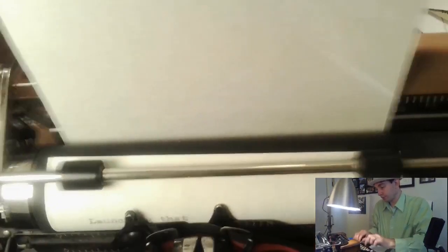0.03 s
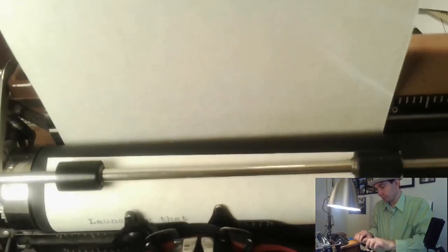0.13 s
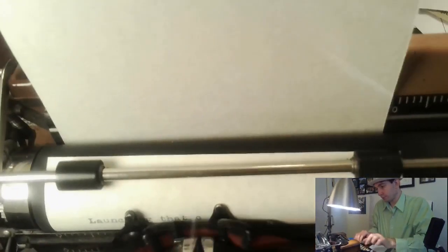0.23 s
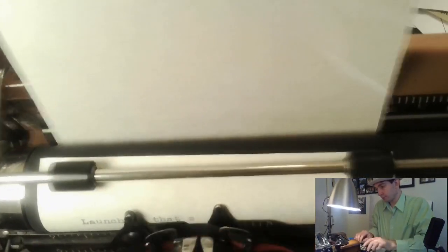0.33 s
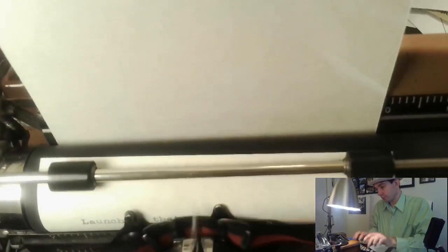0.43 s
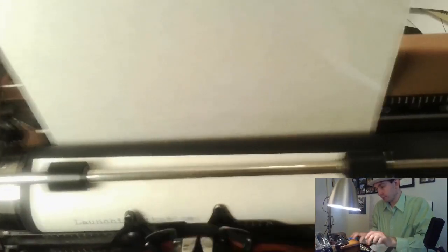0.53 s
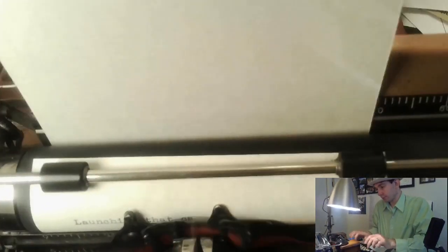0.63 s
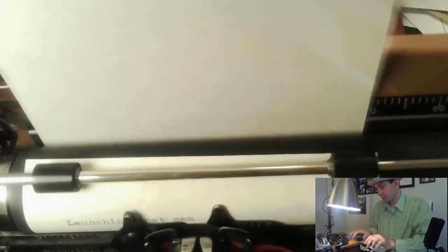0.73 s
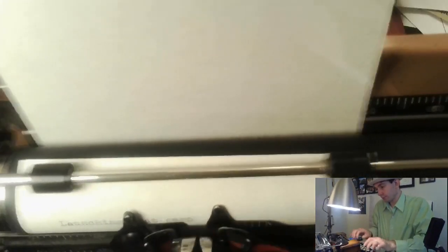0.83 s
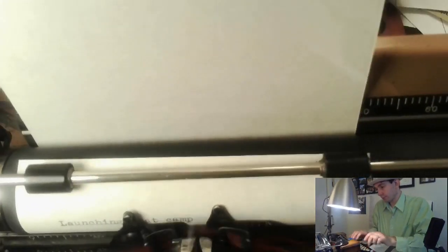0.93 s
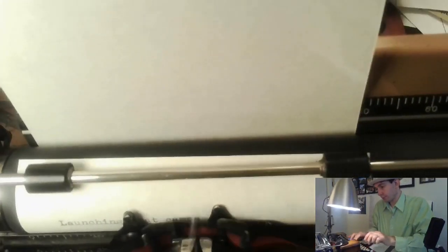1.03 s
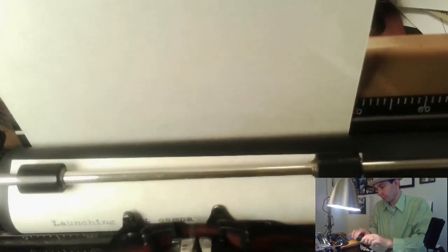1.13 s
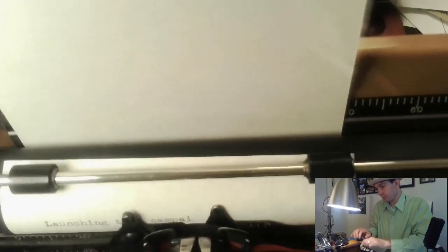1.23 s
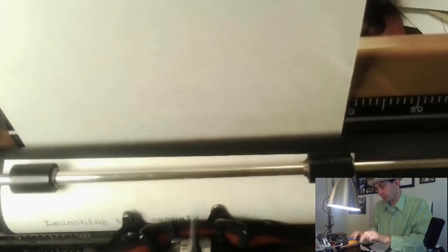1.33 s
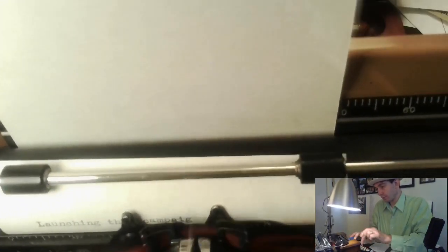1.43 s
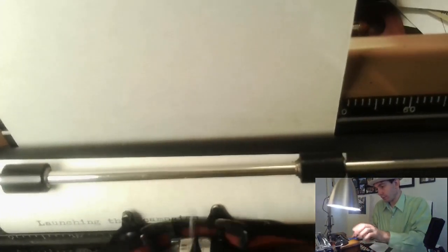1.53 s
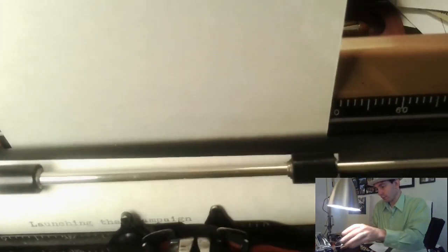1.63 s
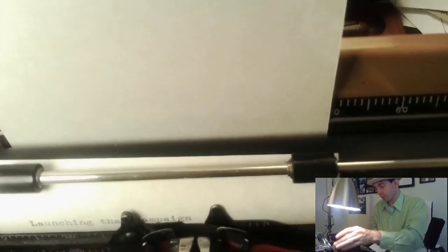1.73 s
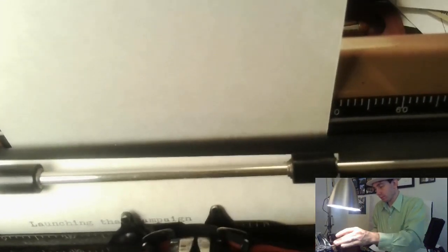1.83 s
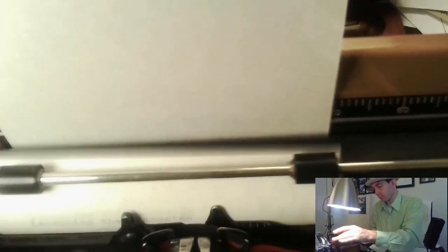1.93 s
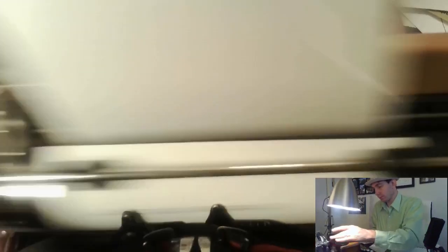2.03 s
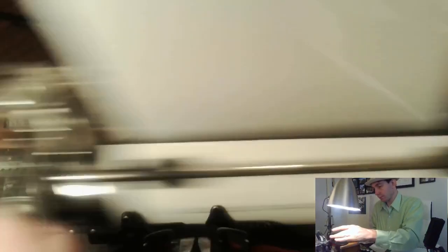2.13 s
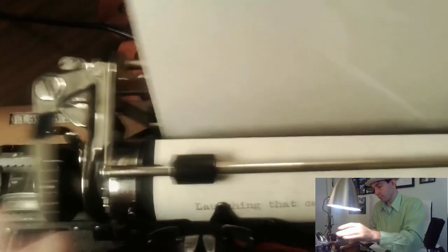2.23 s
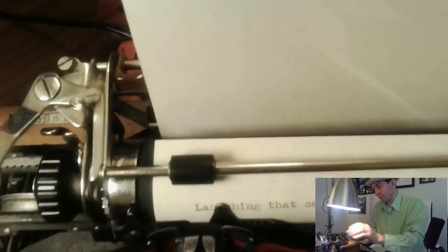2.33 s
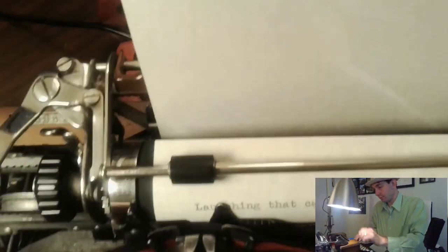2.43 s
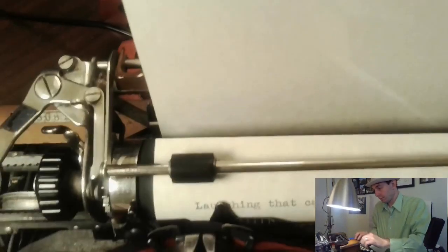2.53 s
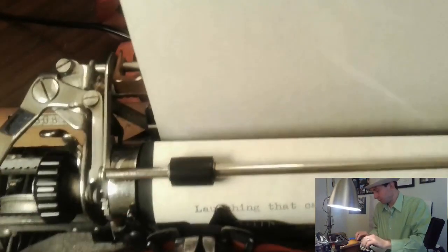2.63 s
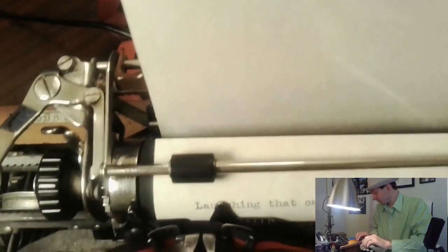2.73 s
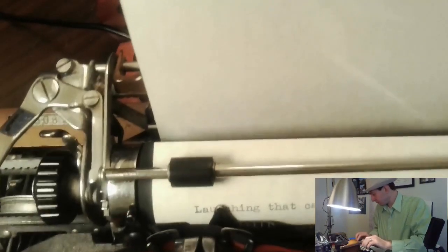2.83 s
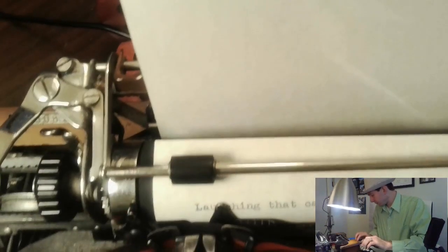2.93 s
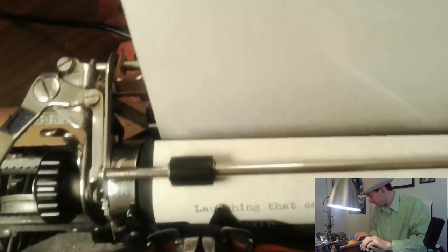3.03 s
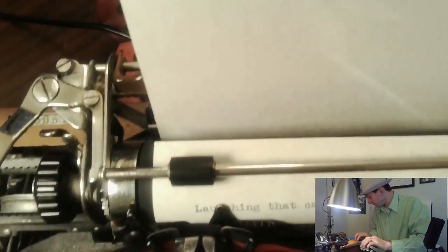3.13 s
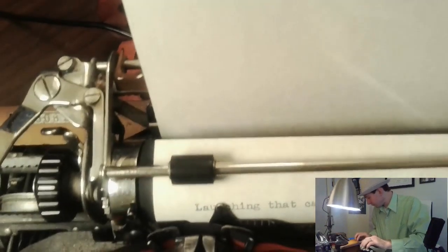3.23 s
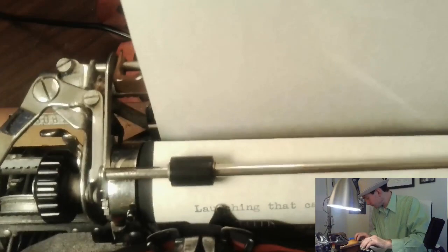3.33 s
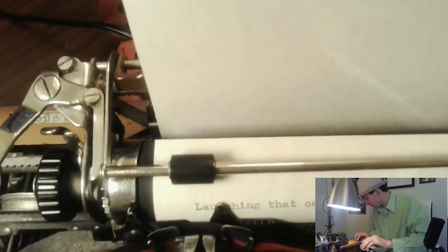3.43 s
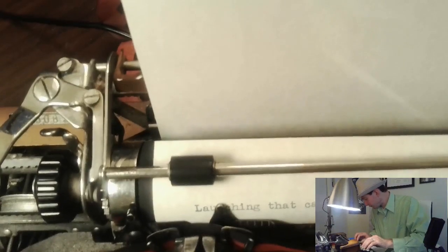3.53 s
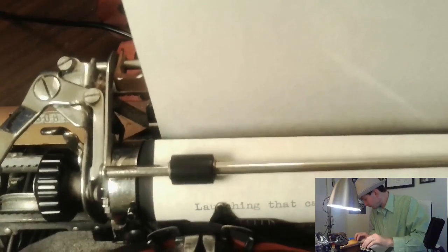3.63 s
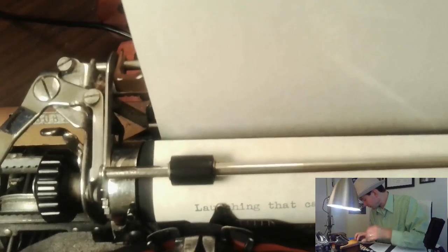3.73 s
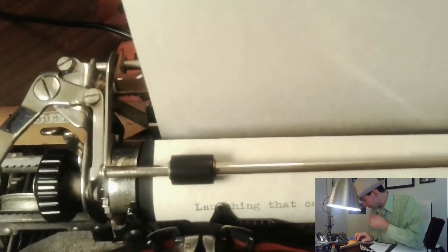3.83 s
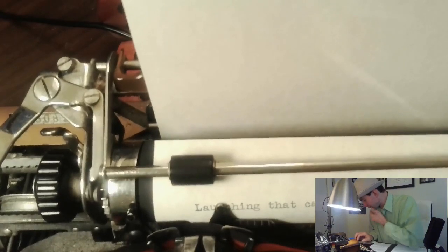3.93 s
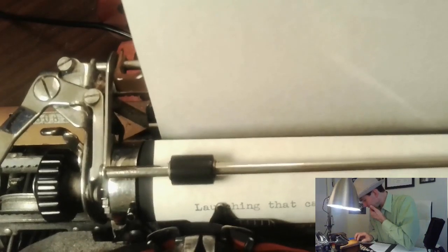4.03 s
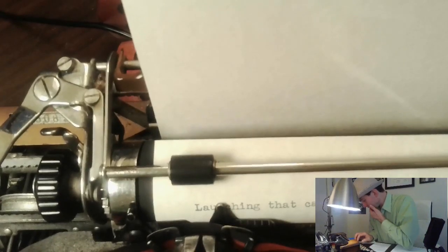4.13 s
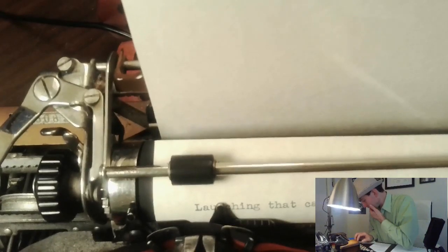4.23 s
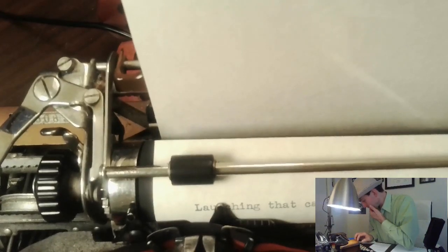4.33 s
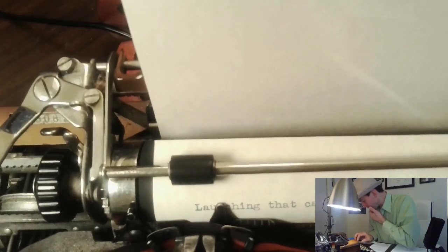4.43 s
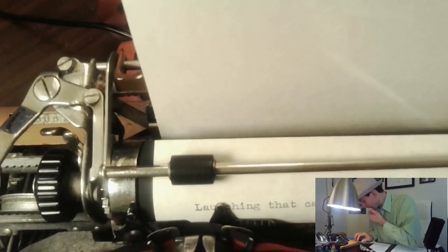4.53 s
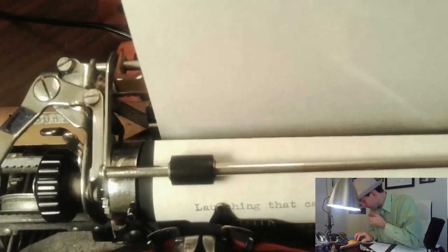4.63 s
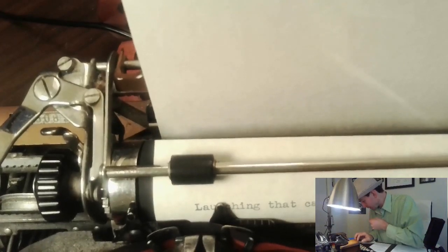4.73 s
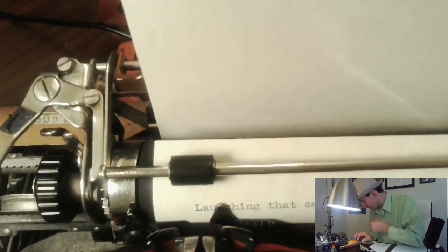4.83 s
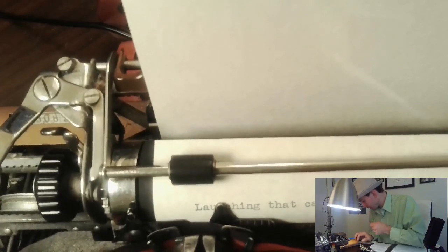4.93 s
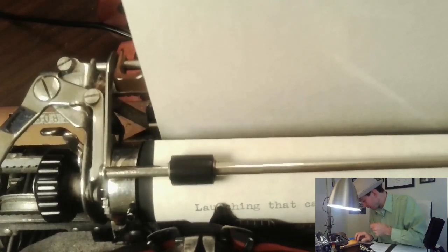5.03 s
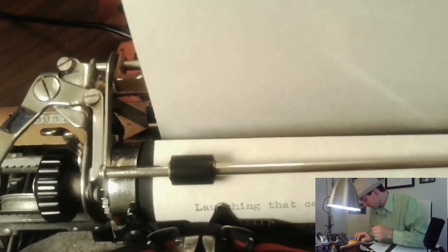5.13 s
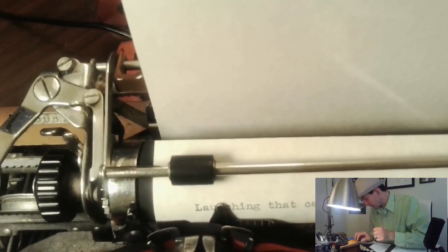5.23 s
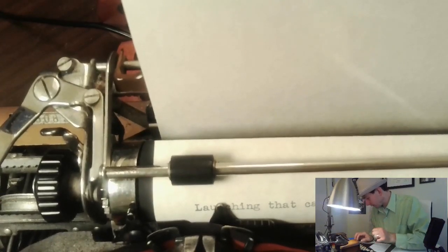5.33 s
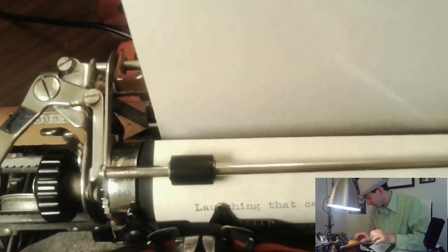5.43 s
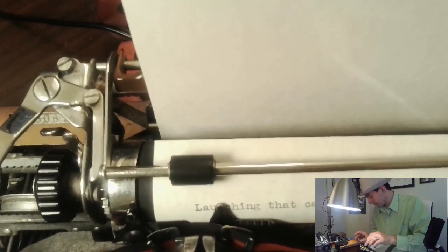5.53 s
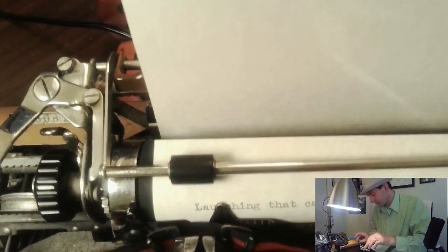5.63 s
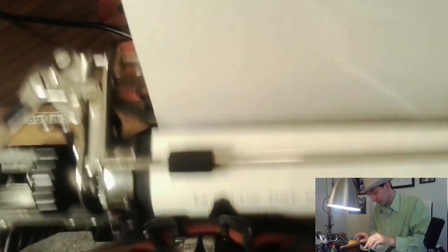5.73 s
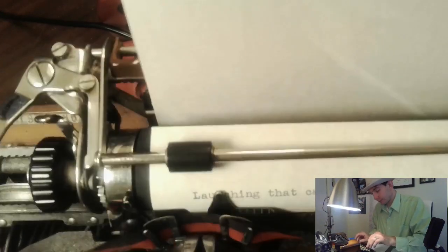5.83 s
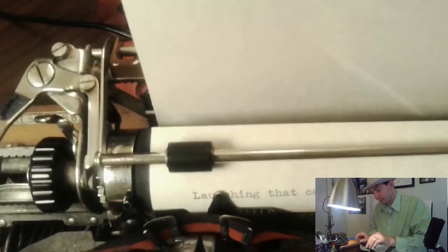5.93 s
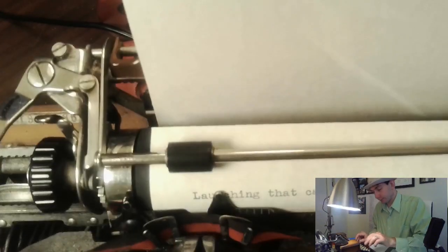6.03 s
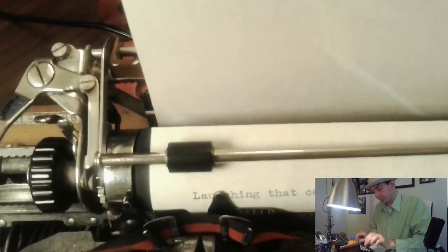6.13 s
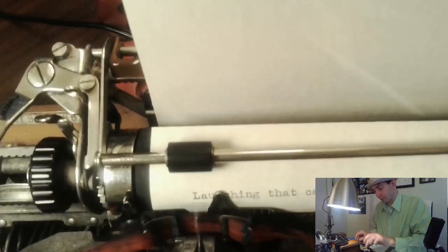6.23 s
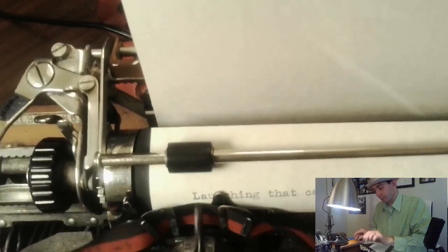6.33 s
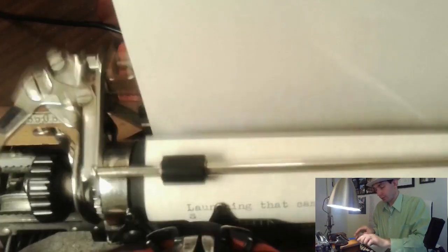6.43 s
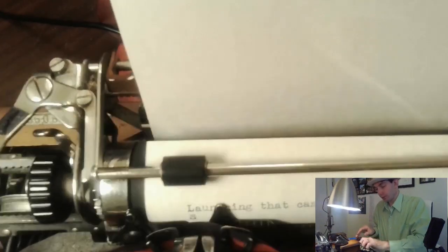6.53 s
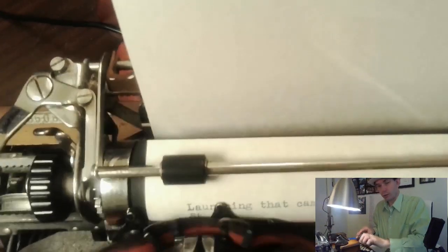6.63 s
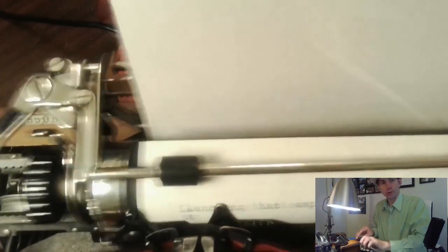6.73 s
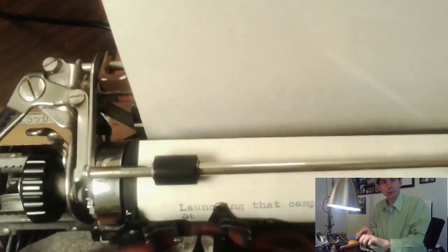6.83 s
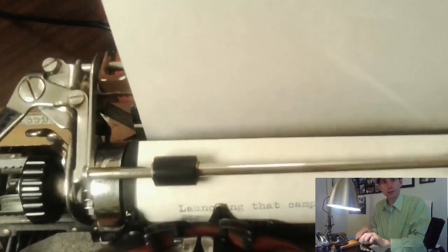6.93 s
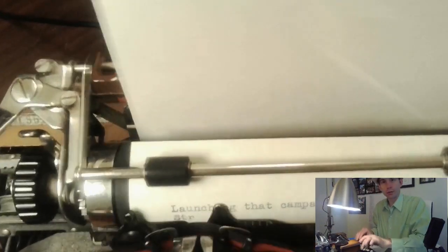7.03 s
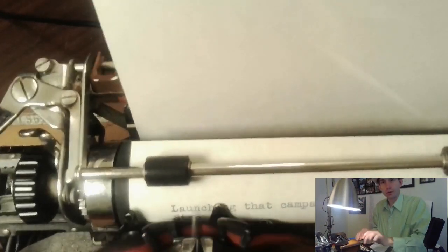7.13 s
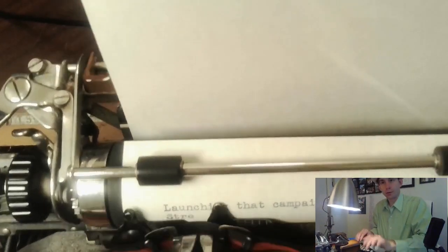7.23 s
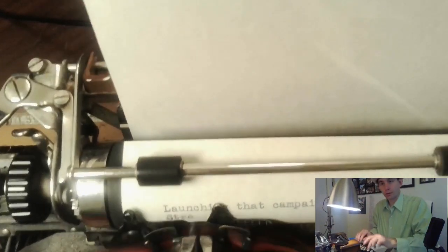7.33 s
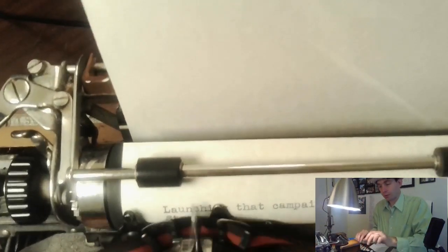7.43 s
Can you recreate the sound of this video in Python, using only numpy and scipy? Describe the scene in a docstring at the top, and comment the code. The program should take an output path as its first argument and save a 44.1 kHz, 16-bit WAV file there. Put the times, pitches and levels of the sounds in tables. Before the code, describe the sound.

The fading ring of a typed letter leads into a fast, slightly uneven run of metallic smacks on the rubber roller of a manual typewriter. A brief buzzing ratchet ends in heavy steel clunks that shake the desk. After a long hush with barely audible brushing, the shift knocks, a bell hums very softly, and typing restarts more hesitantly. Close, dry indoor pickup with a short room tail.

```python
"""First the ring of a letter already struck, over quiet room air and a thin whine; then a fast run of typing.
A manual typewriter stands close to the microphone in a small room. The carriage is pushed back over its
ratchet; after a pause the shift key and a faint bell lead to a second run. Each letter is a tick of linkage,
the smack of the type bar on the platen, then a duller knock as the bar falls back and the carriage steps on.
Noise bursts coloured by filters make the contacts, decaying sines the ringing parts."""
import sys
import numpy as np
from scipy import signal
from scipy.fft import rfft, irfft
from scipy.io import wavfile
from scipy.ndimage import uniform_filter1d, minimum_filter1d

SR = 44100
rng = np.random.default_rng(int(sys.argv[2]) if len(sys.argv) > 2 else 0)


def unload_audio(sound):
    """Save the sound as a 16-bit wav file, at the path given as the first command line argument."""
    columns = np.transpose(np.atleast_2d(sound))
    # keep every value between -1 and 1, then stretch to whole-number steps
    steps = np.round(np.clip(columns, -1, 1) * 32767)
    wavfile.write(sys.argv[1], SR, steps.astype(np.int16))


N = 329868
RING = np.arange(SR) / SR  # the second that follows a blow
# stretches, in samples, over which the loudness of clicks, bodies and the desk is set
CLICK, BODY, DESK = 130, 440, 660


def undb(db):
    """Decibels to gain."""
    return 10 ** (np.asarray(db) / 20)


def unit(x, size):
    """Scale so that the loudest stretch of size samples has rms 1."""
    return x / np.sqrt(uniform_filter1d(x * x, size, mode="constant").max())


def add(track, s, db, sound, size):
    """Mix a sound in from time s, its loudest stretch of size samples at db; drop what precedes time 0."""
    sound = undb(db) * unit(sound, size)
    i = int(round(s * SR))
    sound, i = sound[max(-i, 0):], max(i, 0)
    track[i:i + len(sound)] += sound[:N - i]


def curve_db(hz, points):
    """A spectrum joined by straight lines in log frequency."""
    f, db = np.transpose(points)
    return np.interp(np.log(hz + 1), np.log(f), db)


def response(points, peaks=(), size=8192):
    """Causal (minimum-phase) frequency response of a broad colour with resonances on it."""
    hz = np.arange(size // 2 + 1) * SR / size
    db = curve_db(hz, points)
    for f, width, up in peaks:
        db = db + up / (1 + (2 * (hz - f) / width) ** 2)
    # folding the cepstrum onto positive time makes the response causal
    cepstrum = irfft(np.log(undb(db)))
    cepstrum[1:size // 2] *= 2
    cepstrum[size // 2 + 1:] = 0
    return np.exp(rfft(cepstrum))


def chatter(colour, length, shape=2, swell=0.17, size=8192):
    """Loose parts meet many times in quick succession and ring a colour; contacts build up, then die away."""
    age = RING[:size] / length
    build_up = 1 - np.exp(-age / swell)
    force = rng.standard_normal(size) * build_up * np.exp(-age ** shape)
    return irfft(rfft(force) * colour)


def ring(modes, scatter_db, detune, rise_s, size=16384):
    """Decaying modes; each blow shares its force among them a little differently."""
    hz, db, t60 = np.transpose(modes)[:, :, None]
    pitch, phase, share = rng.standard_normal((3, len(modes), 1))
    t = RING[:size]
    waves = np.sin(2 * np.pi * (hz * (1 + detune * pitch) * t + phase))
    sizes = undb(db + scatter_db * share) * np.exp(-np.log(1000) * t / t60)
    return (sizes * waves).sum(axis=0) * (1 - np.exp(-t / rise_s))


# room air, shape of its spectrum: f/Hz, relative level/dB per Hz
AIR = [(30, -45.5), (70, -13.5), (135, -1), (280, -4), (700, -12.5), (1400, -14.5), (2200, -21),
       (3300, -23.5), (5500, -27.5), (8000, -26), (12000, -23.5), (15500, -29.5)]
# faint electrical tones: f/Hz, rms level/dB
WHINE = [(8000, -84), (11752, -81), (12252, -87)]
AIR_DB = -63.5  # rms of the air


def background():
    """Quiet room air is shaped noise; a thin electrical whine is steady sines."""
    hz = np.arange(N // 2 + 1) * SR / N
    air = irfft(rfft(rng.standard_normal(N)) * undb(curve_db(hz, AIR)), N)
    t = np.arange(N) / SR
    whine = sum(np.sqrt(2) * undb(db) * np.sin(2 * np.pi * f * t) for f, db in WHINE)
    return undb(AIR_DB) * air / air.std() + whine


# broad colour of small steel parts: f/Hz, level/dB
STEEL = [(200, -41), (1000, -18), (3300, -18.5), (5000, -14), (6500, -7), (8600, -12), (10000, -8),
         (11000, -1.5), (13500, -4), (15500, -14.5)]
# their resonances: f/Hz, width/Hz, height/dB
STEEL_PEAKS = [(2810, 270, 8.5), (4020, 220, 4.5), (7054, 140, 10), (8020, 380, 15.5), (9237, 600, 17),
               (10630, 380, 9), (11150, 250, 4.5), (13950, 200, 4.5), (15200, 200, 5.5)]


def steel_part(spread_db=3, detune=0.0071):
    """Colour of one small steel part: no two levers ring quite alike."""
    chance = rng.standard_normal((len(STEEL_PEAKS), 2))
    peaks = []
    for (hz, width, db), (pitch, height) in zip(STEEL_PEAKS, chance):
        peaks.append((hz * (1 + detune * pitch), width, db + spread_db * height))
    return response(STEEL, peaks)


# colour of the first hard contact: f/Hz, level/dB
CRACK = [(100, -13), (400, -3), (1050, -7), (1700, -6), (2400, 0), (3400, -11.5), (5000, -8.5),
         (7000, -4.5), (12000, -19.5)]
# dense low modes of the frame: f/Hz, level/dB
FRAME = [(30, -34.5), (70, -16.5), (130, -6), (220, -3.5), (330, -6.5), (600, -4), (780, -7.5),
         (950, -19.5), (2500, -23.5)]


def ticks(table, click_db, snap_db, crack_db, frame_db, swell, brisk_s=0.0025):
    """Light contacts that hardly shake the frame: brisk ones snap, slow ones only rustle."""
    out = np.zeros(N)
    contact, frame = response(CRACK), response(FRAME)
    for s, db, length in table:
        steel = steel_part()
        brisk_db = 20 * np.log10(min(1, brisk_s / length))  # a longer chatter snaps less
        add(out, s, db + snap_db + brisk_db, chatter(steel, 0.0013, swell=.05), CLICK)
        add(out, s, db + click_db, chatter(steel, length, shape=1.5, swell=swell), CLICK)
        add(out, s, db + crack_db, chatter(contact, length), CLICK)
        add(out, s, db + frame_db, chatter(frame, .025, shape=0.86), BODY)
    return out


# colour of the shaken basket of type bars: f/Hz, level/dB
BASKET = [(300, -18.5), (1000, -11), (1700, -8.5), (2400, 3), (3400, -6.5), (4500, -9), (6000, 0),
          (10000, -22.5)]
# its resonances: f/Hz, width/Hz, height/dB
BASKET_PEAKS = [(2898, 160, 11.5), (4005, 470, 19)]
# modes of the type bars and springs: f/Hz, level/dB, decay t60/s
BAR_MODES = [(2912, -5, .16), (3910, -10.5, 0.27), (3980, 0.5, .5), (4200, -3.5, 0.23), (7750, -6.5, 0.5),
             (9050, -5, .22), (9350, 0, 0.37), (9620, -4, .22), (10750, -7, .2)]
# modes of the case: f/Hz, level/dB, decay t60/s
CASE_MODES = [(373, -13, 0.045), (466.5, 0.5, 0.15), (559, 1, 0.07), (624, 4.5, 0.041), (638.7, -9, .08),
              (743, -10.5, 0.24), (840, -21.5, 0.092)]
# modes of the desk: f/Hz, level/dB, decay t60/s
DESK_MODES = [(88, -13, .14), (124, -10, .18), (136, -4, .28), (186, -4, .11), (216, -2, .12),
              (255, -5, .09)]


def blows(table, click_db, snap_db, crack_db, basket_db, bars_db, case_db, frame_db, desk_db,
          swell, crack_s, basket_s, frame_s):
    """Heavy contacts: a snap and a crack, steel chatters, bars ring on, case and desk answer a moment later."""
    out = np.zeros(N)
    contact, basket, frame = response(CRACK), response(BASKET, BASKET_PEAKS), response(FRAME)
    for s, click, body, length in table:
        steel = steel_part()
        jolt = (click + body) / 2  # the bars are shaken through both the linkage and the body
        add(out, s, click + snap_db, chatter(steel, 0.0032, swell=0.052), CLICK)
        add(out, s, click + click_db, chatter(steel, length, swell=swell), CLICK)
        add(out, s + 0.0024, jolt + crack_db, chatter(contact, crack_s, shape=0.8), CLICK)
        add(out, s, jolt + basket_db, chatter(basket, basket_s, shape=0.75, swell=.15), BODY)
        # the ring shifts a little from blow to blow
        add(out, s, jolt + bars_db, ring(BAR_MODES, 3, .01, .003), BODY)
        add(out, s + .002, body + case_db, ring(CASE_MODES, 3.8, 0.0062, .003), BODY)
        add(out, s + .001, body + frame_db, chatter(frame, frame_s, shape=0.96), BODY)
        add(out, s + 0.0018, body + desk_db, ring(DESK_MODES, 2.5, .008, 0.0093), DESK)
    return out


# how a key comes up, its lever letting go, then the escapement sliding over:
# t/s before the step (typical), relative level/dB, chatter length/s
RELEASE = [(.027, -25, 0.011), (.0095, -21, .011)]
# one row per letter: slug meets platen t/s, relative force level/dB, key starts this much earlier/s,
# relative key click level/dB, strike to carriage step/s, relative thud level of that step/dB
KEYS = [(-0.15, 5, .03, -21, 0.11, 2.5), (0.107, -1, 0.034, -20.5, 0.12, -3),
        (0.33, 0, 0.038, -19.5, 0.12, -2.5), (0.499, 0, 0.042, -15.5, 0.12, 0),
        (0.685, -0.5, 0.028, -17, 0.1, -2), (0.85, -0.5, .03, -35, .12, -4),
        (1.038, -3, 0.033, -19, 0.1, 1.5), (1.22, 1, 0.027, -22, 0.11, 1), (1.375, -0.5, .028, -17, .12, 1),
        (6.182, 1.5, 0.03, -24.5, 0.15, -8), (6.542, -2.5, 0.035, -21, 0.11, 3),
        (6.779, -3, 0.044, -17, 0.11, 1), (6.989, 0.5, .031, -16, 0.11, 2.5),
        (7.258, 2.5, 0.052, -18.5, 0.13, 2)]
STEP_CHATTER_S = 0.0086
RELEASE_SPREAD, RELEASE_SPREAD_DB = .12, -0.5  # from finger to finger: share of the times, level


def keys_up():
    """Linkage rustles as each key rises; the bar falls back and the carriage steps on with a dull knock."""
    steps = [(s + held, 0, thud, STEP_CHATTER_S) for s, *_, held, thud in KEYS]
    chance = rng.standard_normal((len(KEYS), 2))
    releases = []
    for (step_s, *_), (slow, firm) in zip(steps, chance):
        for before, db, length in RELEASE:
            s = step_s - before * (1 + RELEASE_SPREAD * slow)
            releases.append((s, db + RELEASE_SPREAD_DB * firm, length))
    linkage = ticks(releases, click_db=-4.0, snap_db=-3.5, crack_db=-15.5, frame_db=-18, swell=0.1)
    knocks = blows(steps, click_db=-19.0, snap_db=-16.5, crack_db=-31, basket_db=-40.5, bars_db=-46.5,
                   case_db=-27.5, frame_db=-32.0, desk_db=-37.5,
                   swell=.2, crack_s=.004, basket_s=.034, frame_s=0.026)
    return linkage + knocks


KEY_CHATTER_S, STRIKE_CHATTER_S = 0.0061, 0.015


def keys_down():
    """The finger takes up the key lever's play with a click; the bar hits the platen and shakes the machine."""
    presses = [(s - lead, click, KEY_CHATTER_S) for s, _, lead, click, *_ in KEYS]
    strikes = [(s, force, force, STRIKE_CHATTER_S) for s, force, *_ in KEYS]
    levers = ticks(presses, click_db=-2.5, snap_db=-1.5, crack_db=-21.5, frame_db=-16.5, swell=0.14)
    smacks = blows(strikes, click_db=-13, snap_db=-15.0, crack_db=-23.5, basket_db=-24.5, bars_db=-41.5,
                   case_db=-32, frame_db=-30, desk_db=-35.5,
                   swell=0.38, crack_s=.0021, basket_s=0.023, frame_s=0.02)
    return levers + smacks


# the rubber platen under a slug: f/Hz, level/dB, decay t60/s
PLATEN_MODES = [(919, -3, 0.033), (1050, -0.5, 0.027), (1285, 2.5, 0.02), (1610, -0.5, 0.016),
                (2100, -2, 0.034)]


def type_bars(slide_db=-27, flight_s=0.025, platen_db=-28.5, late_s=.003):
    """Each bar slides up its slot with a rising rasp; its slug knocks the platen just after the first click."""
    out = np.zeros(N)
    for s, force, *_ in KEYS:
        rasp = chatter(steel_part(), flight_s, swell=0.99)
        add(out, s - flight_s, force + slide_db, rasp, CLICK)
        add(out, s + late_s, force + platen_db, ring(PLATEN_MODES, 4, 0.058, .0005), CLICK)
    return out


# loose levers: t/s, relative click level/dB, chatter length/s
TICKS = [(1.252, -21.5, 0.011), (1.436, -17.5, 0.0026), (1.563, -19, 0.0015), (1.602, -34.5, 0.0018),
         (1.783, -33.5, .016), (1.799, -28, 0.011), (2.158, -24, .017), (2.191, -23, 0.0056),
         (6.302, -24.5, 0.012), (6.442, -21, .002)]


def loose_levers():
    """Loose steel levers click on their own."""
    return ticks(TICKS, click_db=-3.5, snap_db=-5, crack_db=-21.5, frame_db=-20, swell=0.16)


# line lever, carriage and shift meeting their stops:
# t/s, relative steel level/dB, relative body level/dB, chatter length/s
KNOCKS = [(1.859, -24, -37.5, 0.019), (2.068, -18.5, -34.5, .019), (2.082, -16.5, -42, .014),
          (2.111, -21.5, -41.5, 0.0071), (2.221, -14, -38, 0.0085), (2.548, -37, -57.5, 0.0053),
          (2.578, -41.5, -58, .007), (2.703, -74, -61, .012), (5.501, -34, -54, 0.0036),
          (5.656, -16.5, -44, 0.019), (5.677, -19, -33.5, 0.014), (5.779, -33.5, -49.5, 0.011),
          (6.338, -18.5, -28, 0.018), (6.357, -19.5, -28.5, 0.019), (6.374, -16, -30.5, 0.0077)]


def stops():
    """Line lever, carriage and shift meet their stops, each a heavy blow of steel on the body."""
    return blows(KNOCKS, click_db=-1.5, snap_db=-5.0, crack_db=-9.0, basket_db=-19.5, bars_db=-28,
                 case_db=-0.5, frame_db=2.5, desk_db=-3,
                 swell=0.29, crack_s=0.0064, basket_s=0.038, frame_s=0.02)


# the hand starts the push and brings it up to speed; the faster the teeth pass, the harder the pawl drops
RETURN_FROM_S, RETURN_TO_S = 1.905, 2.066
START_TEETH_PER_S, TOP_TEETH_PER_S, SPEED_UP_S = 80, 138, .04
RATCHET_DB, RATCHET_DB_PER_DOUBLING = -19, 9.5  # at top speed; change with speed


def ratchet(bright_db=4, dull_db=-4, basket_db=-25, frame_db=-27, chatter_share=0.78):
    """The pawl drops over tooth after tooth as the carriage is pushed home, and keeps the bars shivering."""
    out = np.zeros(N)
    tilt = response([(4000, dull_db), (8000, -0.15), (12000, bright_db)], [(5600, 360, 9.1)])
    pawl = response(STEEL, STEEL_PEAKS) * tilt
    basket, frame = response(BASKET, BASKET_PEAKS), response(FRAME)
    s = RETURN_FROM_S
    while s < RETURN_TO_S:
        lag = np.exp((RETURN_FROM_S - s) / SPEED_UP_S)
        rate = TOP_TEETH_PER_S + (START_TEETH_PER_S - TOP_TEETH_PER_S) * lag
        db = RATCHET_DB + RATCHET_DB_PER_DOUBLING * np.log2(rate / TOP_TEETH_PER_S)
        # the pawl chatters for a share of the time between two teeth
        add(out, s, db, chatter(pawl, chatter_share / rate), CLICK)
        add(out, s, db + basket_db, chatter(basket, .02, shape=0.95), BODY)
        add(out, s, db + frame_db, chatter(frame, 0.0053), BODY)
        s += 1 / rate
    return out


# heavy blows of carriage, line lever and shift that also rock the desk: t/s, level/dB
JOLTS = [(2.084, -28.5), (2.222, -33.5), (6.364, -28)]


def desk_jolts(frame_db=-3, frame_s=.016):
    """The heavy blows of carriage, line lever and shift also rock the desk: a deep thump of desk and frame."""
    out = np.zeros(N)
    for s, db in JOLTS:
        add(out, s, db, ring(DESK_MODES, 1.1, .008, 0.0025), DESK)
        add(out, s, db + frame_db, chatter(response(FRAME), frame_s, shape=0.95), BODY)
    return out


# a hand or sleeve near the face, then fingers on the keys: t/s, relative level/dB, length/s
TOUCHES = [(3.85, -70, .15), (4.35, -65, 0.071), (5.14, -61, 0.04), (5.29, -63.5, 0.078)]


def faint_rustles():
    """Faint slow rustles: first a hand or sleeve near the face, then fingers brushing the keys."""
    return ticks(TOUCHES, click_db=0.0, snap_db=-6, crack_db=-25.0, frame_db=-18, swell=0.47)


# the margin bell: f/Hz, level/dB, decay t60/s
BELL_MODES = [(2799, -13, 1.7), (6562, -8, 1.0), (6571, -12, 1.0), (10659, 0, .7)]
BELL_S, BELL_DB = 5.66, -51


def bell():
    """The jolt of the shift sets the bell humming faintly."""
    out = np.zeros(N)
    add(out, BELL_S, BELL_DB, ring(BELL_MODES, 0.36, 0, 0.0018, size=SR), BODY)
    return out


def room(x, low_db=-6, high_db=-7, t60_low=0.39, t60_high=0.24, first_s=0.002, build_s=.004):
    """Desk and near walls return a short diffuse tail, its treble dying sooner than its bass."""
    noise = rng.standard_normal(SR)
    low = signal.sosfilt(signal.butter(2, 1200, fs=SR, output="sos"), noise)
    high = signal.sosfilt(signal.butter(2, 1200, "high", fs=SR, output="sos"), noise)
    build_up = 1 - np.exp(-np.maximum(RING - first_s, 0) / build_s)
    tail = 0
    for band, db, t60 in (low, low_db, t60_low), (high, high_db, t60_high):
        fade = np.exp(-np.log(1000) * RING / t60) * build_up
        tail = tail + undb(db) * band * fade / np.linalg.norm(fade)
    return x + signal.fftconvolve(x, tail)[:N]


def scene():
    """Machine and rustles sound into the same room, over its air and whine."""
    letters = keys_up() + keys_down() + type_bars()
    carriage = stops() + ratchet() + desk_jolts()
    near_sounds = letters + loose_levers() + carriage + faint_rustles() + bell()
    return (room(near_sounds) + background())[None]


CEILING = .52  # limiter ceiling, full scale = 1
TOP_HZ = 15700


def record(dry, size=100):
    """The close microphone thins the deep bass; a fast limiter holds the peaks down, and the top is cut."""
    thin = signal.sosfilt(signal.butter(2, 70, "high", fs=SR, output="sos"), dry)
    needed = np.minimum(1, CEILING / (np.abs(thin) + 1e-9))
    # the gain dips shortly before each peak and recovers after it
    gain = uniform_filter1d(minimum_filter1d(needed, size), size)
    return signal.sosfilt(signal.ellip(10, .2, 80, TOP_HZ, fs=SR, output="sos"), thin * gain)


dry = scene()
out = record(dry)
unload_audio(out)
```